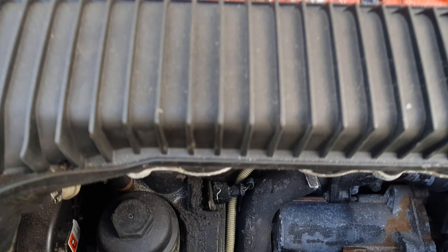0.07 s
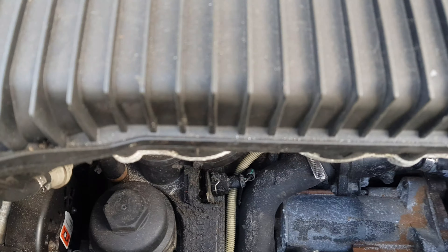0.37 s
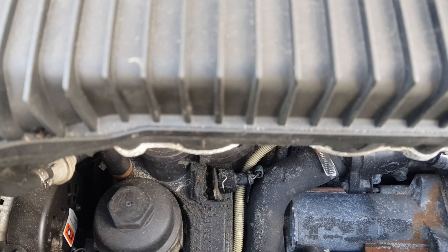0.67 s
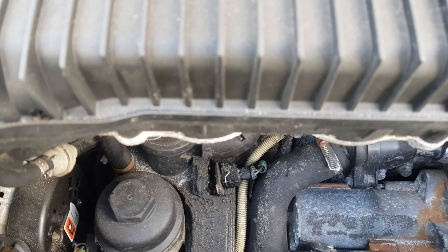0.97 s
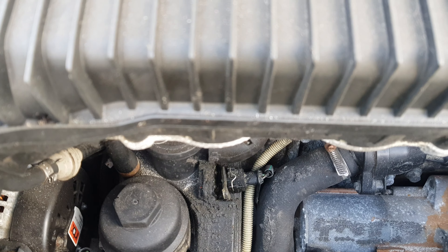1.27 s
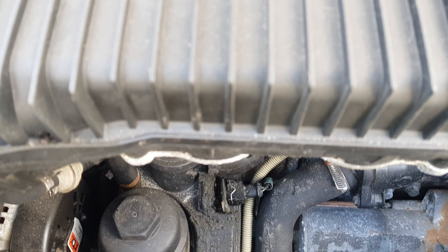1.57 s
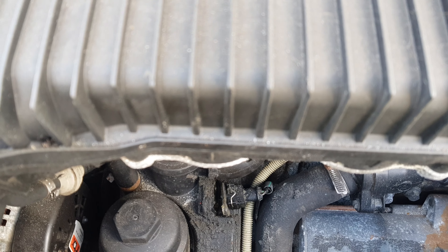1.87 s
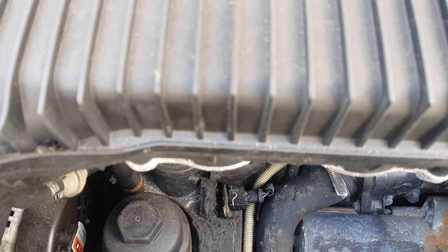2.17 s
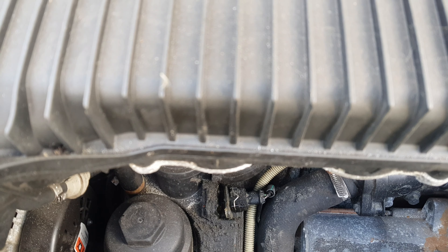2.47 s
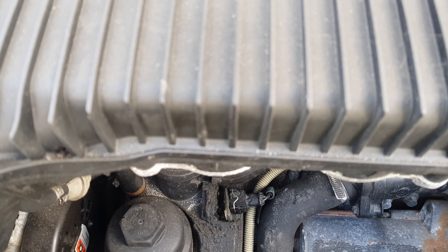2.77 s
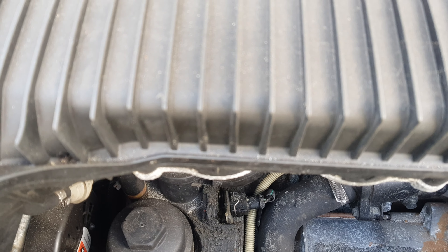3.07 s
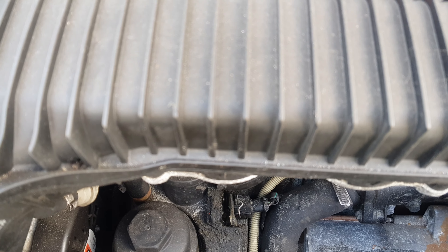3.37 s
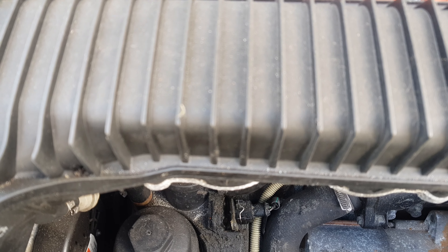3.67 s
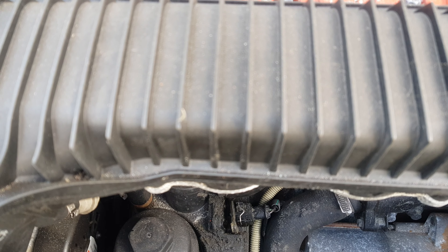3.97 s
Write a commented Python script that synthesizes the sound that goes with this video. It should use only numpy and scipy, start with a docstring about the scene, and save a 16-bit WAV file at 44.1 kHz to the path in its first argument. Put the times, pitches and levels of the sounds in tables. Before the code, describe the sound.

A car engine knocks and ticks as it is gently revved three times, heard close.

```python
"""In an open engine bay, close to a car engine that is gently revved up and down three times.
Its firing pulses boom and drone, and air rushes in as it speeds up. Under throttle something inside
knocks about once per engine cycle, each knock a short rattle that rings the engine block.
The valves tick over rumble, clatter and hiss. One bright snap marks the start of the second rev,
and a faint whistle falls as the revs drop at the end."""
import sys
import numpy as np
from scipy import signal
from scipy.io import wavfile
from scipy.ndimage import uniform_filter1d

SR = 44100
rng = np.random.default_rng(int(sys.argv[2]) if len(sys.argv) > 2 else 0)


def transcribe(u):
    """Save the signal u as a 16-bit wav file named by the first command-line argument.

    u: samples, shape (n,) or (channels, n), limited to [-1, 1]; the rate is SR.
    q: integer samples, one column per channel.
    """
    v = np.clip(np.atleast_2d(u).T, -1, 1)
    q = np.round(v * 32767).astype(np.int16)
    wavfile.write(sys.argv[1], SR, q)


N = 176400
T = np.arange(N) / SR
PULSES_PER_CYCLE = 5  # each cylinder fires once per engine cycle

# how loud the moving parts are: t/s, rumble level/dB, clatter level/dB
MACHINE_LEVELS = [(0.0, -26, -26), (0.63, -24, -25.5), (0.88, -25.5, -26.5), (1.26, -23.5, -24.5),
                  (1.57, -29.5, -31), (1.85, -34.5, -33.5), (2.03, -30, -31), (2.22, -30, -29),
                  (2.45, -33, -32), (2.84, -36.5, -38.5), (3.12, -38.5, -39.5), (3.31, -34.5, -34.5),
                  (3.48, -30.5, -31), (4.0, -36.5, -35.5)]
# the notes at which the engine block and its covers ring: f/Hz, level/dB, time to fade by 60 dB/s
BLOCK_NOTES = [(370, -7, .06), (583, -7, 0.044), (862.5, -3.5, 0.1), (1083, 3, 0.028), (1227, 4, .035),
               (1456, 1.5, .05), (1580, -13, 0.046), (2034, 4.5, 0.02), (2280, -20, 0.037),
               (2610, -7.5, 0.043), (2781, -10, 0.088), (3218, -3, 0.028)]
# how alike left and right are: f/Hz, likeness (1 = the same, 0 = unrelated)
STEREO_LIKENESS = [(30, 1), (120, 1), (250, 0.86), (500, 1), (1000, -0.21), (2000, 0.043), (4000, 0.044),
                   (12000, 0)]


def from_db(db):
    """Turn decibels into a number to multiply by."""
    return 10 ** (np.asarray(db) / 20)


def rms_one(x):
    """Scale a signal so that its average power is 1."""
    return x / np.sqrt(np.mean(x ** 2) + 1e-20)


def in_time(rows):
    """Join a table's points with straight lines, giving each column a value at every sample."""
    times, *columns = np.transpose(rows)
    return [np.interp(T, times, column) for column in columns]


def at_hz(points, hz):
    """Read a table at one frequency, with octaves evenly spaced."""
    freqs, values = np.transpose(points)
    return np.interp(np.log(hz), np.log(freqs), values)


def pan(db):
    """Left and right gains that make the left louder by db."""
    return from_db(np.array([[.5], [-.5]]) * db)


def spread(pair, hz):
    """Mix two unrelated signals into left and right, with the width and balance of that pitch."""
    # which side is louder: f/Hz, left minus right/dB
    balance = [(60, 4), (200, -2), (380, 5), (700, 1), (1200, 0), (2000, -1.5), (3000, 6.5), (4500, 2.5),
               (7000, -3.5), (10000, 6), (14000, -1)]
    alike = np.clip(at_hz(STEREO_LIKENESS, hz), -.999, .999)
    shared = np.sqrt(1 + alike) * pair[0]
    opposite = np.sqrt(1 - alike) * pair[1] * [[1], [-1]]
    return pan(at_hz(balance, hz)) * (shared + opposite) / np.sqrt(2)


def drift(hz):
    """A smooth random wobble, about 1 in size; a higher hz makes it quicker."""
    r = np.exp(-80 * np.pi * hz / SR)
    noise = rng.standard_normal(N // 40 + 2002)  # one value per 40 samples, plus a run-up
    slow = signal.lfilter([1], [1, -2 * r, r * r], noise)[2000:]
    return np.interp(np.arange(N) / 40, np.arange(len(slow)), rms_one(slow))


def ring(x, hz, fade_s):
    """Each click in x starts a note that fades by 60 dB in fade_s."""
    r, w = np.exp(-np.log(1000) / (fade_s * SR)), 2 * np.pi * hz / SR
    return signal.lfilter([0, np.sin(w)], [1, -2 * r * np.cos(w), r * r], x + 1e-18)


def clicks(times, sizes):
    """Silence with a single click at each of the times."""
    out = np.zeros(N)
    inside = (times >= 0) & (times < (N - 1) / SR)
    np.add.at(out, (times[inside] * SR).astype(int), sizes[inside])
    return out


def dying(train, decay_s):
    """A loudness curve that jumps at each click and dies away; energies add up."""
    return np.sqrt(signal.lfilter([1], [1, -np.exp(-2 / (decay_s * SR))], train ** 2 + 1e-18))


def coloured(colour, loudness=1):
    """Stereo noise that follows a loudness curve; colour sets how strong its bands are to each other."""
    edges = np.geomspace(22, 17000, 25)
    white = rng.standard_normal((2, 2, N)) * loudness
    out, power = 0, 0
    for k, (low, high) in enumerate(zip(edges, edges[1:])):
        if high < colour[0][0] or low > colour[-1][0]:
            continue
        hz = np.sqrt(low * high)
        pair = signal.sosfilt(signal.butter(2, [low, high], "band", fs=SR, output="sos"), white[k % 2])
        gain = from_db(at_hz(colour, hz))
        out += gain * spread(pair, hz)
        power += gain ** 2 * (high - low) / SR * (1 + at_hz(STEREO_LIKENESS, hz))
    return out / np.sqrt(power)


def resonance(hz, centre_hz, width_hz, lift_db):
    """How much a tone swells near a pitch at which something likes to vibrate."""
    return from_db(lift_db / (1 + ((hz - centre_hz) / width_hz) ** 2))


def firing(firing_hz, pulse_count):
    """Firing pulses boom and drone; uneven cylinders add weaker tones that swell as the bay resonates."""
    # the boom, at the firing rate: t/s, level/dB
    boom = [(0.0, -24), (0.03, -25), (0.9, -22), (1.6, -8), (1.79, -25), (1.82, -20.5), (1.95, -34),
            (2.23, -12.5), (2.33, -10.5), (2.43, -10.5), (2.46, -21.5), (2.52, -8), (2.64, -11),
            (2.7, -22.5), (3.02, -38.5), (3.06, -38), (3.19, -41.5), (3.55, -10), (3.64, -17),
            (3.69, -10.5), (3.77, -10.5), (3.84, -13.5), (3.91, -23), (4.0, -28)]
    # the drone, an octave higher: t/s, level/dB
    drone = [(0,-21.5),(.4,-21.5),(.76,-21.5),(1.1,-30.5),(1.36,-44),(1.58,-43),(1.75,-25),(1.9,-27.5),(2.06,-26),(2.2,-40),(2.45,-47),(2.58,-47.5),(2.68,-32),(2.76,-28),(2.87,-35.5),(3.03,-34),(3.075,-42),(3.14,-32.5),(3.3,-29.5),(3.42,-26),(3.5,-43.5),(3.72,-52.5),(3.85,-34.5),(3.94,-30.5),(4,-31)]
    # the weaker tones: pitch as a multiple of the engine's cycle rate
    multiples = (4, 6, 7, 15, 16, 20)
    # the same tones: level/dB against the rumble
    tone_levels = [-15.5, -10.5, -17.5, -15, -11, -14.5]
    (boom_db,), (drone_db,) = in_time(boom), in_time(drone)
    rumble_db, _ = in_time(MACHINE_LEVELS)
    angle = 2 * np.pi * pulse_count
    out = from_db(boom_db - 0.8 + 0.8 * drift(14.5)) * np.sin(angle)
    out += from_db(drone_db + 0.74 + drift(40)) * np.sin(2 * angle)
    for multiple, db in zip(multiples, tone_levels):
        ratio = multiple / PULSES_PER_CYCLE
        panel = resonance(ratio * firing_hz, centre_hz=401.8, width_hz=15.6, lift_db=14.5)
        cavity = resonance(ratio * firing_hz, centre_hz=112.3, width_hz=4, lift_db=5.5)
        tone = np.sin(ratio * angle + 2 * np.pi * rng.random())
        out += panel * cavity * from_db(rumble_db + db + 0.62 * drift(2.7)) * tone
    return np.sqrt(2) * out * pan(db=0.63)


def valve_beats(pulse_count):
    """One slightly uneven click for each cylinder, in a pattern that repeats every cycle."""
    # each cylinder's click: level/dB
    pattern = [0, -2.5, -.5, -1.5, -3]
    jitter_s, uneven_db = .0012, 1.1
    beat = np.arange(int(pulse_count[-1]))
    chance = rng.standard_normal((len(beat), 2))
    times = np.interp(beat, pulse_count, T) + jitter_s * chance[:, 0]
    db = np.array(pattern)[beat % PULSES_PER_CYCLE] + uneven_db * chance[:, 1]
    return clicks(times, from_db(db))


def pulsing(beats, share, decay_s):
    """A steady loudness with a share of its power pulsing to the beats."""
    return np.sqrt(1 - share + share * rms_one(dying(beats, decay_s)) ** 2)


def machinery(pulse_count):
    """Rumble and clatter pulse with the cylinders and keep the block humming."""
    # tone of the low rumble: f/Hz, level/dB
    rumble_colour = [(25, -21), (50, -15), (110, 3.5), (170, -4), (260, -6.5), (400, 1), (520, -1),
                     (700, 0.5), (900, -7.5), (1300, -16)]
    # tone of the brighter clatter: f/Hz, level/dB
    clatter_colour = [(550, -2), (900, 2.5), (1400, 0.5), (2000, 1.5), (3000, -3.5), (4000, -6), (5500, -1),
                      (7500, -55.5)]
    rumble_db, clatter_db = in_time(MACHINE_LEVELS)
    beats = valve_beats(pulse_count)
    rumble = coloured(rumble_colour, from_db(rumble_db - 1) * pulsing(beats, share=0.15, decay_s=0.012))
    shake = from_db(clatter_db) * pulsing(beats, share=0.15, decay_s=0.0077)
    noise = rng.standard_normal((2, N))
    hum = 0
    for k, (hz, db, fade_s) in enumerate(BLOCK_NOTES):
        hum += (-1) ** k * from_db(db) * ring(spread(noise, hz), hz, fade_s)
    clatter = coloured(clatter_colour, from_db(-1) * shake)
    return rumble + clatter + from_db(-3) * shake * rms_one(hum)


def uneven_hits(count, spread_db):
    """A random strength and direction for each hit, left and right."""
    return rng.choice([-1, 1], (2, count)) * from_db(spread_db * rng.standard_normal((2, count)))


def valve_gear(pulse_count):
    """Each valve tick rings a few bright notes, softened by the cover, over a pulsing hiss."""
    # how loud the high sounds are: t/s, tick level/dB, hiss level/dB
    levels = [(0,-39,-34),(.2,-30,-34.5),(.7,-32.5,-35),(1.3,-29.5,-36.5),(1.5,-34,-40),(1.7,-40,-43.5),(1.9,-38,-41),(2.3,-32.5,-38.5),(2.47,-36,-41.5),(2.58,-42,-45),(3.03,-47,-48.5),(3.25,-44,-45),(3.5,-42,-41.5),(3.63,-36.5,-42),(4,-44,-44)]
    # the notes of the valve parts: f/Hz, level/dB, time to fade by 60 dB/s
    valve_notes = [(4840, -8, 0.028), (5300, 2.5, 0.032), (5540, -1.5, 0.037), (5740, -1, 0.025)]
    # tone of the hiss: f/Hz, level/dB
    hiss_colour = [(3500, -41), (5500, 10.5), (7500, 0), (9000, 1.5), (11500, 3), (14000, 2.5),
                   (16000, 0.5)]
    tick_db, hiss_db = in_time(levels)
    beats = valve_beats(pulse_count)
    ticks = 0
    for hz, db, fade_s in valve_notes:
        ticks += from_db(db) * ring(beats * uneven_hits(N, spread_db=3.5), hz, fade_s)
    cover = signal.butter(2, (4100, 6800), "band", fs=SR, output="sos")
    hiss = coloured(hiss_colour, from_db(hiss_db + 2.5) * pulsing(beats, share=0.42, decay_s=0.0079))
    return from_db(tick_db - 2.5) * rms_one(signal.sosfilt(cover, ticks)) + hiss


def intake(firing_hz):
    """Air rushes in while the engine gathers speed."""
    # tone of the rushing air: f/Hz, level/dB
    air_colour = [(270, -15), (330, -1), (430, 4), (520, -20)]
    full_throttle_hz_per_s = 190
    climb_hz_per_s = uniform_filter1d(np.gradient(firing_hz) * SR, size=4000)
    throttle = np.clip(climb_hz_per_s / full_throttle_hz_per_s, 0, 1)
    return coloured(air_colour, from_db(-31.5) * throttle * (firing_hz / firing_hz.mean()) ** 2)


def knocking():
    """A knock is a blow and a quick rattle: every hit cracks, rings the block and echoes round the bay."""
    # the knocks: t/s, blow level/dB, rattle level/dB
    knocks = [(0.051, -16.5, -23), (0.105, -12, -18), (0.16, -15.5, -19), (0.213, -14, -15),
              (0.267, -19.5, -16), (0.33, -19, -22), (0.381, -16, -24), (0.473, -16, -35),
              (0.532, -13, -18.5), (0.626, -10.5, -25), (0.685, -12, -20), (0.726, -11.5, -12.5),
              (0.776, -11, -15), (0.825, -12.5, -13), (0.872, -13, -9), (0.928, -13.5, -21),
              (0.978, -11.5, -25), (1.017, -17, -16.5), (1.065, -18, -17.5), (1.154, -8, -11),
              (1.2, -11.5, -13.5), (1.245, -9.5, -13), (1.299, -15, -19), (1.378, -11.5, -15),
              (1.81, -17, -14), (1.864, -22, -20.5), (1.916, -19, -19), (1.967, -20.5, -17.5),
              (2.016, -18.5, -16), (2.066, -16.5, -17), (2.111, -14.5, -12), (2.157, -15.5, -13),
              (2.2, -16.5, -14), (2.244, -15, -14), (2.286, -13, -14.5), (2.326, -15, -15),
              (2.367, -18, -14.5), (3.042, -32, -28), (3.44, -26, -34), (3.482, -21.5, -22.5),
              (3.521, -19, -21), (3.563, -21.5, -25), (3.602, -22, -22.5)]
    # the first blow and its bounce: delay/s, level/dB
    blow = [(.001, 1.5), (.004, -3.5)]
    # the rattling hits that follow: delay/s, level/dB
    rattle = [(.0085, -2), (0.012, 0.5), (.0155, -6), (.021, -11)]
    # tone of the crack and its echo: f/Hz, level/dB
    knock_colour = [(200, -7.5), (400, -1.5), (800, -1), (1400, -2.5), (2200, -2), (3200, -9),
                    (4200, -17.5), (6000, -17), (8000, -28), (15000, -33)]
    delay_jitter, uneven_db = .1, 0.36
    starts, blow_db, rattle_db = np.transpose(knocks)
    delay, hit_db = np.transpose(blow + rattle)
    is_blow = np.arange(len(delay)) < len(blow)
    db = hit_db + np.where(is_blow, blow_db[:, None], rattle_db[:, None])
    chance = rng.standard_normal((len(starts), 2, len(delay)))
    times = (starts[:, None] + delay * (1 + delay_jitter * chance[:, 0])).ravel()
    sizes = from_db(db + uneven_db * chance[:, 1]).ravel()
    hits = clicks(times, sizes)
    crack = from_db(-5) * dying(hits, decay_s=.001)
    echo = from_db(-8) * dying(hits, decay_s=.01)
    out = coloured(knock_colour, np.hypot(crack, echo))
    for hz, note_db, fade_s in BLOCK_NOTES:
        strengths = sizes * uneven_hits(len(sizes), spread_db=2.5)
        pair = np.array([clicks(times, side) for side in strengths])
        out += from_db(note_db - 9) * ring(spread(pair, hz), hz, fade_s)
    return out * pan(db=0.7)


def snap():
    """One bright click as the throttle opens again."""
    # tone of the click: f/Hz, level/dB
    snap_colour = [(2500, -24), (4000, 0), (5700, 2), (8500, -5), (11000, -8), (16000, -22)]
    click = clicks(times=np.array([1.811]), sizes=from_db([-22.5]))
    return coloured(snap_colour, dying(click, decay_s=.0065))


def whistles():
    """Thin, unsteady whistles as the throttle closes for the last time."""
    # the whistles: start t/s, end t/s, start f/Hz, end f/Hz, relative level/dB
    glides = [(3.61, 3.95, 5250, 4200, 1), (3.6, 3.68, 4350, 4450, 3), (3.62, 4.0, 8950, 8900, -4),
              (3.62, 3.96, 9720, 9700, -9)]
    wobble_hz, flutter_db = 110, 4
    out = 0
    for start, end, start_hz, end_hz, db in glides:
        wobble = wobble_hz * np.array([drift(116.3), drift(115)])
        hz = np.interp(T, [start, end], [start_hz, end_hz]) + wobble
        fade = np.interp(T, [start, start + 0.011, end - .05, end], [0, 1, 1, 0])
        tone = np.sin(2 * np.pi * np.cumsum(hz, axis=1) / SR)
        out += from_db(db - 40 + flutter_db * drift(39.4)) * fade * tone
    return out


def scene():
    """Engine speed drives the drone, intake, machinery and valves; knocks, snap and whistles join in."""
    # engine speed, as firing pulses per second: t/s, f/Hz
    speed = [(0,91.34),(.7,100),(1.05,105.9),(1.3,111.9),(1.45,115.1),(1.56,111.5),(1.7,98.8),(1.82,89),(2.05,103.1),(2.25,116),(2.41,122.8),(2.56,112.5),(2.8,90.2),(3.0,74.6),(3.09,70),(3.24,82.4),(3.4,102.6),(3.56,124.5),(3.75,113),(4,89.5)]
    firing_hz, = in_time(speed)
    pulse_count = np.cumsum(firing_hz) / SR
    return (firing(firing_hz, pulse_count) + intake(firing_hz) + knocking() + snap()
            + machinery(pulse_count) + valve_gear(pulse_count) + whistles())


def record(dry):
    """Round off the tallest peaks and cut the very highest treble."""
    cutoff_hz = 15800
    rounded = dry / (1 + dry ** 6) ** (1 / 6)
    return signal.sosfilt(signal.ellip(12, .1, 90, cutoff_hz, fs=SR, output="sos"), rounded)


dry = scene()
out = record(dry)
transcribe(out)
```